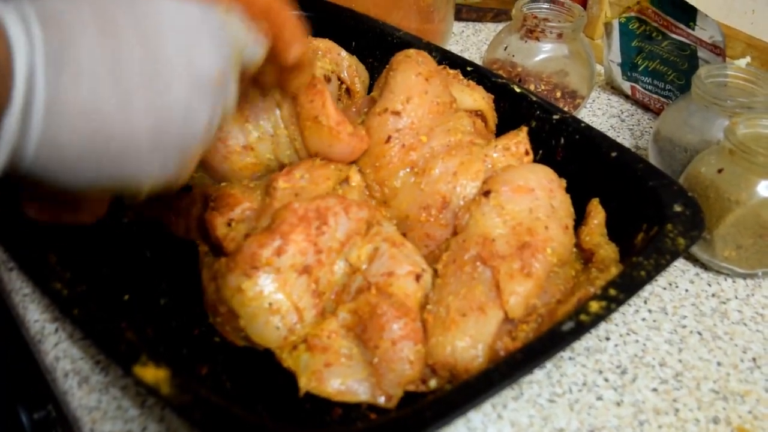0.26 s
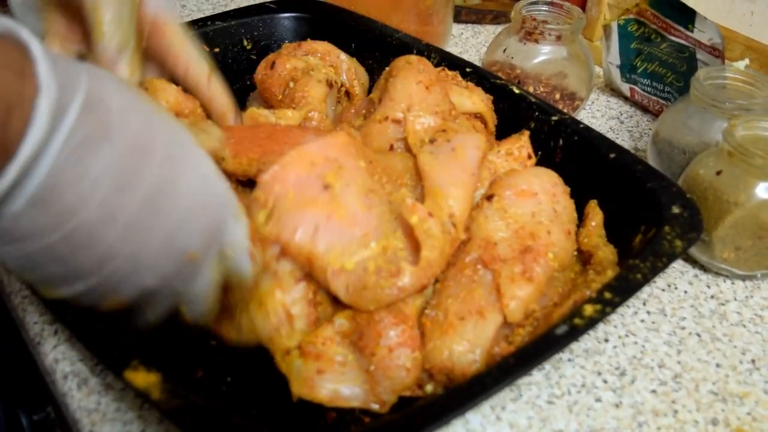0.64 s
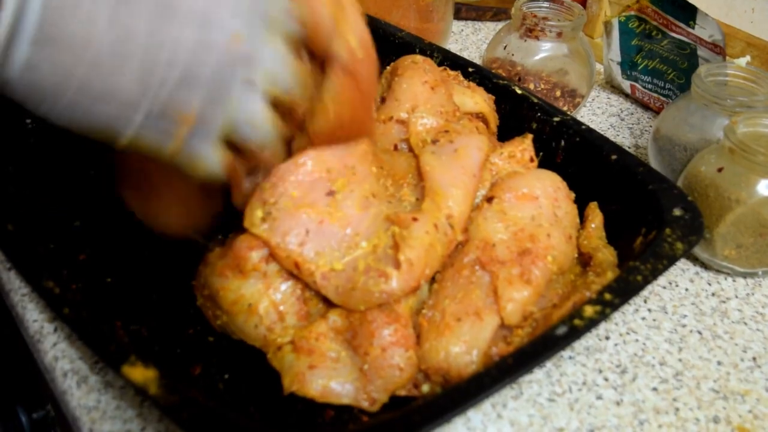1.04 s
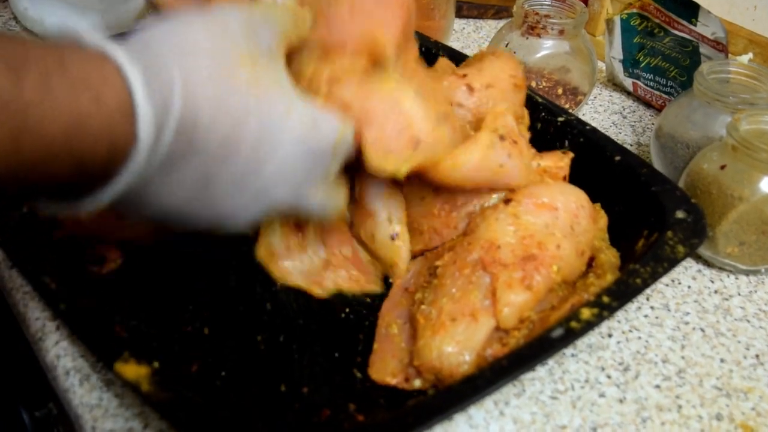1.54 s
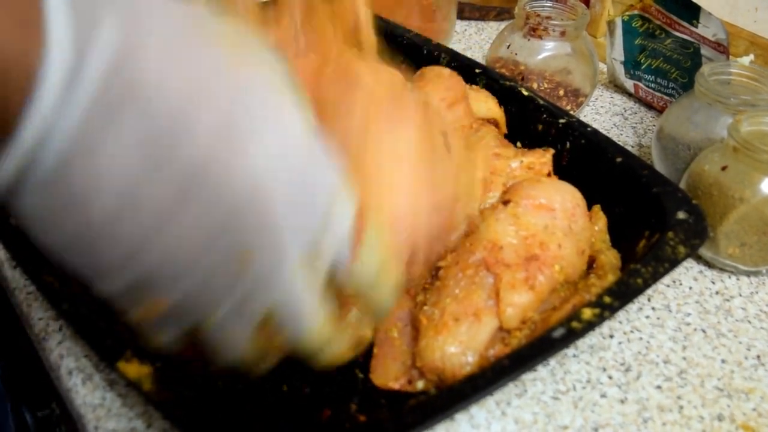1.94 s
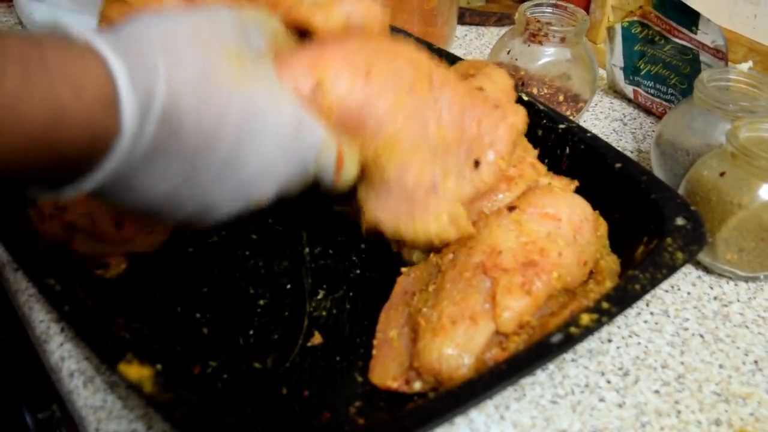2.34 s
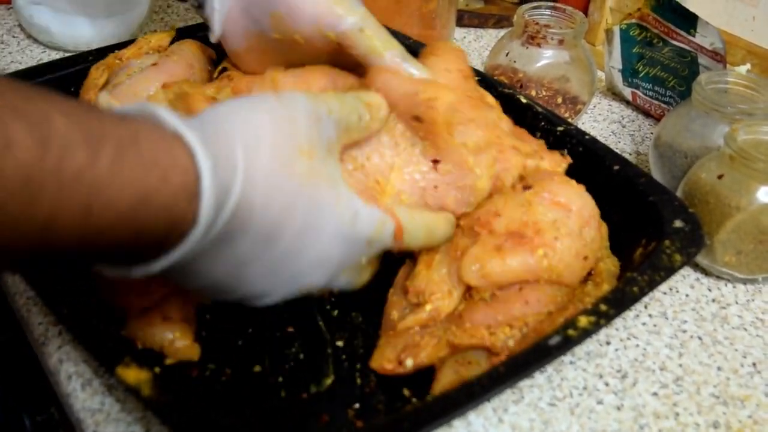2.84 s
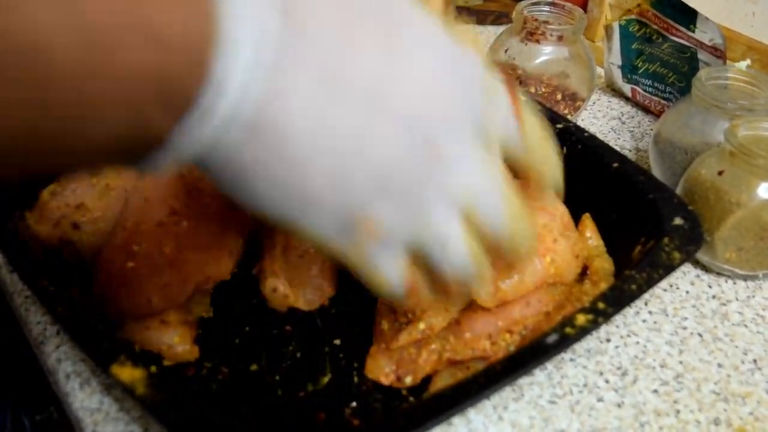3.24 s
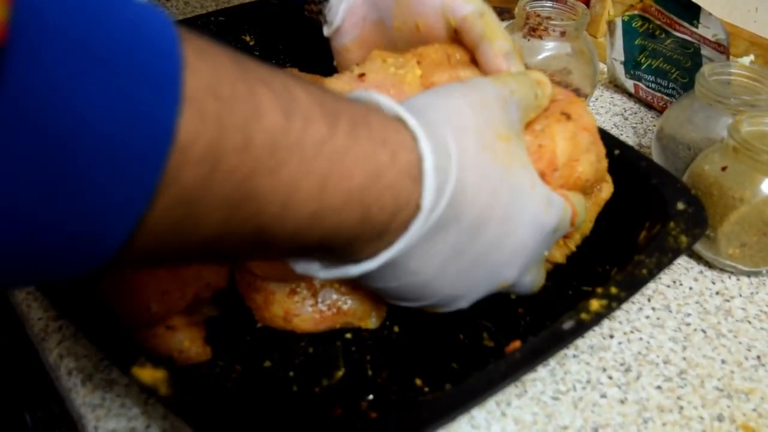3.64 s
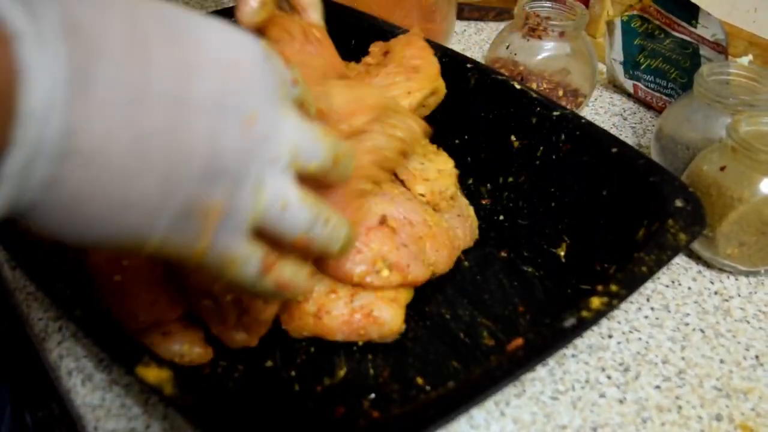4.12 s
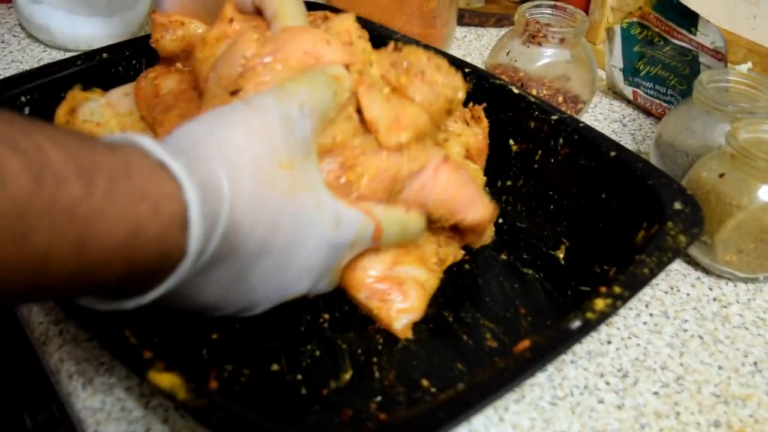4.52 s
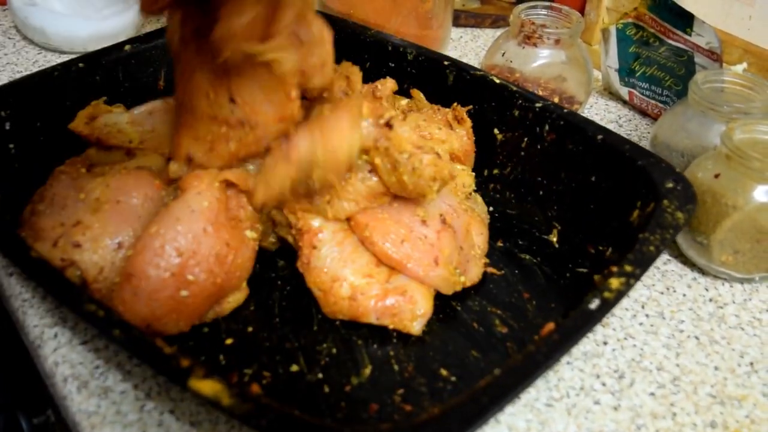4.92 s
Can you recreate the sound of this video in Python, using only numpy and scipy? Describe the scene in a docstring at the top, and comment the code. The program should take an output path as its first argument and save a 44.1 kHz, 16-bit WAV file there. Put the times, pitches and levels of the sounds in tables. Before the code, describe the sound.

Close wet squishing and sticky popping of meat being tossed and kneaded, with dull hollow bangs from the metal tray beneath it.

```python
"""Knocks of a metal roasting tray on a kitchen counter, and oily raw chicken squelching under gloved hands.
The tray rings as a sum of damped modes, and low modes and noise make its bumps and rumble.
The meat is crowds of tiny bursting cavities and noise, with snapping air pockets and flat wet slaps.
A small kitchen answers with a diffuse tail over a faint hush; the hardest knocks overload the recorder."""
import sys
import numpy as np
from scipy import signal
from scipy.fft import rfft, irfft, next_fast_len
from scipy.io import wavfile
from scipy.ndimage import uniform_filter1d, map_coordinates

SR = 44100
rng = np.random.default_rng(int(sys.argv[2]) if len(sys.argv) > 2 else 0)


def int16_out(signal):
    """Quantize to a 16-bit WAV file."""
    q = np.round(np.clip(np.atleast_2d(signal).T, -1, 1) * 32767)
    wavfile.write(sys.argv[1], SR, q.astype(np.int16))


N = 227997  # length in samples

# The tray hits the counter: start_s [s], level_db [dB, clang before trim],
# edge_db [dB, hard edge sought relative to the clang]
TRAY_KNOCKS = [(0.001, -15.5, -10.5), (0.141, 0, -14.5), (0.383, -19.5, -20), (0.548, -16, -25),
               (0.607, -10.5, -12), (0.63, -18, -8.5), (0.752, -16, -31.5), (0.803, -24.5, -39),
               (1.072, -37.5, 4.5), (1.14, -39.5, -2), (1.211, -27.5, 26), (1.458, -28, -2),
               (1.527, -20.5, -47), (1.962, -19.5, -8), (1.979, -9, -46), (1.989, -12, -28),
               (2.036, -18, -4), (2.077, -8, -14.5), (2.21, -25, -7), (2.43, -25, -35.5),
               (2.49, -31.5, -12), (2.561, -28.5, 0), (2.672, -2, -5.5), (2.681, -7, -14.5),
               (2.824, -11, -11.5), (3.093, -19, -32), (3.215, -10, -9), (3.318, -21.5, 7),
               (3.419, -12, -25), (3.606, -14, -16), (3.911, -19.5, -14), (4.062, -15.5, -10),
               (4.194, -21.5, -33), (4.34, -20.5, -3.5), (4.417, -22.5, -9), (4.428, -14.5, -24),
               (4.528, -28.5, -30), (4.672, -26.5, -43), (5.003, -39, -20.5)]
# Spectrum of the tray's flexing rumble: frequency_hz [Hz], density_db [dB per Hz, relative]
FLEX_SPECTRUM = [(20, -64.5), (48, -3), (68, 2.5), (85, -4.5), (115, -2.5), (135, -1.5), (160, -8.5),
                 (400, -7.5), (1500, -37)]
# The low thud grows less than the clang does
THUD_DB, THUD_PER_PEAK = -28.5, 0.32
# A soft landing trades edge for hollow body, which also grows less than the clang
HOLLOW_DB, HOLLOW_PER_EDGE, HOLLOW_PER_PEAK = -15, 0.3, 0.2
# A heavier landing presses more meat on the metal and leaves less ring
LINGER_DB, LINGER_PER_PEAK = -21.5, 0.39


def tray(rumble_db):
    """Impact and flexure: the tray rocks under the hands, knocking and rumbling on the counter."""
    out = np.zeros(N)
    for start_s, level_db, edge_db in TRAY_KNOCKS:
        thud_db = THUD_DB - THUD_PER_PEAK * level_db
        hollow_db = HOLLOW_DB - HOLLOW_PER_EDGE * edge_db - HOLLOW_PER_PEAK * level_db
        linger_db = LINGER_DB - LINGER_PER_PEAK * level_db
        blow = knock(thud_db, hollow_db, edge_db, linger_db)
        add(out, start_s, amp(level_db - 6.0) * blow)
    rumble = amp(rumble_db - 3.0) * noise(FLEX_SPECTRUM)
    return out + rumble


# Modes of the loaded tray: pitch_hz [Hz, nominal], level_db [dB, nominal], t60_s [s, lingering part]
TRAY_MODES = [(52.4, -7, 0.4), (113.6, -6, 0.44), (190, -17, 0.1), (273, -5.5, 0.098), (320.8, 1.5, 0.29),
              (375.5, -2, 0.49), (408, -6, 0.21), (512, -6, 0.47), (579, -3.5, 0.45), (663, -1, 0.14),
              (725, -5.5, 0.27), (796, -6, 0.044), (888, -5, 0.15), (955, -22, 0.089), (1150, -24, 0.44),
              (1294, -2.5, 0.53), (1320, -5.5, 0.38), (1375, -17, 0.34), (1504, -20, 0.081),
              (1802, -15.5, 0.057), (2420, -13, 0.075), (2800, -26, 0.14)]
# Filter for the contact clack: frequency_hz [Hz], density_db [dB per Hz, relative]
CLACK_SPECTRUM = [(30, -30.5), (110, -15.5), (200, -14), (330, -8.5), (700, -6.5), (1350, -10),
                  (1750, -14.5), (2100, -23), (2600, -26.5), (3700, -26.5), (5200, -43), (16000, -55)]


def knock(thud_db, hollow_db, edge_db, linger_db):
    """Modal impact: a noisy clack excites modes that the meat damps quickly and that linger faintly."""
    t = np.arange(SR // 2) / SR
    ring = np.zeros(len(t))
    for pitch_hz, level_db, t60_s in TRAY_MODES:
        # the shifting load detunes each mode a little and changes its share
        pitch_hz = pitch_hz * rng.normal(1, 0.01)
        level_db = level_db + rng.normal(0, 2.5)
        decay = amp(-60 * t / 0.053) + amp(linger_db - 60 * t / t60_s)
        swell = 1 - np.exp(-t * pitch_hz / 1.24)  # each mode needs about a cycle to build up
        mode = np.sin(2 * np.pi * (pitch_hz * t + rng.random()))
        ring += amp(level_db) * decay * swell * mode

    # the soft load spreads the contact over a few milliseconds
    landing = 1 - np.exp(-t / 0.0025)
    contact = (amp(-60 * t / 0.034) + amp(-18 - 60 * t / 0.049)) * landing
    clack = unit(colour(rng.standard_normal(len(t)) * contact, CLACK_SPECTRUM))
    blow = kitchen(amp(-2) * unit(ring) + clack, wet_db=-8)

    # where and how softly the tray lands sets the balance of thud, hollow body and edge
    clang = band_level(blow, 200, 1600)
    thud = 20 * np.log10(band_level(blow, 40, 180) / clang)
    hollow = 20 * np.log10(band_level(blow, 200, 450) / clang)
    edge = 20 * np.log10(band_level(blow, 1800, 4000) / clang)
    thud_lift = thud_db + 13.0 - thud
    hollow_lift = np.clip(hollow_db + 3 - hollow, -10, 6)
    edge_lift = np.clip(edge_db - edge, -4, 9)
    balance = [(120, thud_lift), (190, hollow_lift), (380, hollow_lift),
               (600, 0.028), (1400, 0.014), (2600, edge_lift)]
    blow = colour(blow, balance)
    return blow / band_level(blow, 200, 1600)


# Meat is pressed down and the tray's floor flexes: start_s [s], level_db [dB], pitch_hz [Hz]
FLOOR_BUMPS = [(1.981, -26, 50.7), (2.045, -30, 63.6), (2.485, -42.5, 122), (2.693, -23, 111),
               (3.321, -35, 60), (3.365, -34, 108), (4.235, -35, 121), (4.355, -34, 48.3)]


def bumps():
    """Slow forcing: a gradual push swells one low mode of the loaded tray, without any clack."""
    out = np.zeros(N)
    t = np.arange(SR // 3) / SR
    swell = (t / 0.02) ** 2 * np.exp(2 - 2 * t / 0.018)
    for start_s, level_db, pitch_hz in FLOOR_BUMPS:
        add(out, start_s, amp(level_db) * swell * np.sin(2 * np.pi * pitch_hz * t))
    return out


# Spectrum of the tearing oily films: frequency_hz [Hz], density_db [dB per Hz, relative]
FILM_SPECTRUM = [(500, -19.5), (1500, -8.5), (3000, -3.5), (4200, -2), (5600, -2.5), (6800, -8), (8200, -8),
                 (9500, -7), (12000, -7.5), (16000, -13)]
# Spectrum of the squish between the pieces: frequency_hz [Hz], density_db [dB per Hz, relative]
FLESH_SPECTRUM = [(100, -8.5), (300, -6), (750, 2.5), (1300, 5), (2100, 0), (3500, -2), (6000, -3),
                  (16000, -53)]


def squelch(crackle_db, squish_db):
    """Cavity bursting: oily films crackle finely, larger cavities squish, and sliding smears both."""
    crackle = bubbles(count=9000, centre_hz=7340, spread=0.557, cycles=3.6, scatter_db=5.0, rise=0.091)
    squish = bubbles(count=5500, centre_hz=2480, spread=0.686, cycles=2.85, scatter_db=5.5, rise=0.11)
    tearing = unit(colour(crackle, FILM_SPECTRUM))
    squishing = unit(colour(squish, FLESH_SPECTRUM))
    # under hard kneading the single pops merge into a dense smear
    smear = np.interp(crackle_db, [-55, -40], [0.45, 0.7])  # share of the power
    films = np.sqrt(1 - smear) * tearing + np.sqrt(smear) * noise(FILM_SPECTRUM)
    flesh = np.sqrt(1 - smear) * squishing + np.sqrt(smear) * noise(FLESH_SPECTRUM)
    wet = amp(crackle_db + 1.0) * films + amp(squish_db - 1.5) * flesh
    return kitchen(sticking(crackle_db) * wet, wet_db=-12.5)


def bubbles(count, centre_hz, spread, cycles, scatter_db, rise):
    """Bubble resonance: a crackle of rms 1 from tiny cavities, each a damped sine rising as it opens."""
    start = rng.integers(0, N, count)
    hz = np.clip(centre_hz * np.exp(spread * rng.standard_normal(count)), 300, 17000)
    size = amp(scatter_db * np.minimum(rng.exponential(size=count), 4))
    life = cycles * np.exp(0.5 * rng.standard_normal((count, 1)))  # decay constant in cycles
    age = np.arange(SR // 200)  # samples
    turns = hz[:, None] * age / SR
    fade = np.exp(-turns / life)
    tone = np.sin(2 * np.pi * turns * (1 + rise * (1 - fade)))
    envelope = fade * (1 - fade ** 2) * (1 - age / len(age))
    grains = (size * np.sqrt(hz))[:, None] * tone * envelope
    places = start[:, None] + age
    return unit(np.bincount(places.ravel(), grains.ravel(), N)[:N])


# The wet faces stick and slip, so the squelch comes in short clumps
STICK_DB, STICKS_PER_S = 2.0, 150
# Under a firmer grip than SLIDING_DB the faces slide more smoothly
SLIDING_DB, STICK_PER_DB = -45, 0.1


def sticking(crackle_db):
    """Stick-slip friction: a random gain of rms 1 that flutters most where the crackle is weak."""
    knots = rng.standard_normal(N // 50)
    flutter = map_coordinates(knots, [np.arange(N) * STICKS_PER_S / SR], mode="wrap")
    depth_db = STICK_DB * np.clip(1 + STICK_PER_DB * (SLIDING_DB - crackle_db), 0, 2)
    return unit(amp(depth_db * flutter))


# A hand squeezes or peels the meat: start_s [s, at full grip], rise_s [s], hold_s [s],
# crackle_db [dB before trim], squish_db [dB before trim], rumble_db [dB before trim, of the tray]
HAND_GRIPS = [(0.0, .05, 0.061, -38.5, -35, -58), (0.24, .08, 0.074, -49.5, -56, -57),
              (0.69, 0.13, 0.019, -35, -34, -45), (0.924, 0.068, 0.012, -45.5, -70, -88),
              (1.327, 0.2, 0.07, -41.5, -34.5, -60), (1.538, 0.17, 0.039, -43, -44.5, -69),
              (1.961, 0.064, 0.21, -40.5, -33, -42.5), (2.314, 0.056, 0.027, -44, -58, -74.5),
              (2.52, 0.1, 0.009, -43, -55, -48), (2.669, 0.032, 0.16, -39.5, -32, -47),
              (2.977, 0.12, 0.06, -43.5, -58, -58), (3.31, .09, 0.026, -47, -42, -40),
              (3.457, 0.19, 0.089, -43, -35, -52), (3.736, 0.1, 0.084, -50, -64, -66),
              (4.076, 0.093, 0.018, -50, -36.5, -47), (4.38, 0.082, 0.11, -40.5, -35, -48),
              (4.64, 0.11, 0.027, -41.5, -54, -66), (4.746, 0.14, 0.023, -46.5, -46, -46),
              (4.888, .04, .02, -61, -59, -71), (5.132, 0.13, .04, -49, -48, -72)]
GRIP_RISE_DB, RELEASE_DB_PER_S = 19, 173  # swell over the rise; fall as the hand lets go
CLING_DB, CLING_DB_PER_S = -7, 47.5  # the meat clings and goes on peeling apart, fainter and for longer
REST_CRACKLE_DB, REST_SQUISH_DB, REST_RUMBLE_DB = -58, -58.5, -74  # the pile settles between grips


def kneading():
    """Power summation: dB of crackle, squish and rumble as grips swell, hold, let go and cling."""
    t = np.arange(N) / SR
    rest_db = [[REST_CRACKLE_DB], [REST_SQUISH_DB], [REST_RUMBLE_DB]]
    power = amp(rest_db) ** 2 * np.ones(N)
    for start_s, rise_s, hold_s, *levels_db in HAND_GRIPS:
        closing = np.maximum(start_s - t, 0) / rise_s
        since = np.maximum(t - start_s - hold_s, 0)
        release_db = np.maximum(-RELEASE_DB_PER_S * since, CLING_DB - CLING_DB_PER_S * since)
        grip_db = release_db - GRIP_RISE_DB * closing
        power += np.outer(amp(levels_db), amp(grip_db)) ** 2
    return 10 * np.log10(power)


# Wet meat slaps down flat: start_s [s], level_db [dB, dry peak before trim], pitch_hz [Hz, trapped air]
WET_SLAPS = [(1.9791, 2.5, 665), (2.0376, -11.5, 1460), (2.6684, -9, 1705), (3.2639, -7, 1520),
             (3.319, -10, 1390)]
# Filter for the slap's crack: frequency_hz [Hz], density_db [dB per Hz, relative]
SMACK_SPECTRUM = [(200, -105), (800, -0.5), (1600, 6.5), (2400, -3.5), (3800, 1), (5600, -2), (7000, -11.5),
                  (10000, -8.5), (16000, -24)]


def slaps():
    """Air expulsion: air squeezed from between two wet faces cracks over a wide band and rings briefly."""
    out = np.zeros(N)
    t = np.arange(SR // 4) / SR
    burst = (amp(-60 * t / 0.012) + amp(-22 - 60 * t / 0.05)) * (1 - np.exp(-t / 0.001))
    ring_envelope = amp(-60 * t / 0.013) * (1 - np.exp(-t / 0.00041))
    for start_s, level_db, pitch_hz in WET_SLAPS:
        crack = unit(colour(rng.standard_normal(len(t)) * burst, SMACK_SPECTRUM))
        pocket = unit(np.sin(2 * np.pi * pitch_hz * t) * ring_envelope)
        slap = crack + amp(3.0) * pocket
        add(out, start_s, amp(level_db + 1.5) * kitchen(slap / np.abs(slap).max(), wet_db=-15))
    return out


# The larger air pockets burst in the meat: start_s [s], level_db [dB, dry peak before trim],
# pitch_hz [Hz, cavity as it starts to open]
POCKET_SNAPS = [(0.1577, -18.5, 2500), (0.4031, -27.5, 3940), (0.5315, -24, 3980), (0.5546, -16.5, 4690),
                (0.5654, -27, 5270), (0.7074, -19, 3240), (0.7357, -19, 2500), (0.9542, -24, 4180),
                (1.07, -42, 4360), (1.1828, -26.5, 3140), (1.2131, -24, 2840), (1.4461, -22.5, 3260),
                (1.543, -18, 2560), (1.788, -32.5, 3850), (2.0734, -11, 2600), (2.2592, -26, 3080),
                (2.3334, -23, 2820), (2.4883, -26, 3540), (2.5637, -22, 3000), (2.6077, -22.5, 3870),
                (2.804, -16.5, 5000), (3.0143, -31.5, 3140), (3.464, -18, 5630), (3.5338, -22, 3270),
                (4.0193, -32, 3500), (4.0604, -20, 4130), (4.0858, -18, 5350), (4.1104, -23.5, 4770),
                (4.1447, -28.5, 2800), (4.5716, -22, 5420), (4.6622, -29, 5530), (4.7483, -25, 2660),
                (4.8913, -28, 4550), (5.1592, -24.5, 5030)]


def snaps(crackle_db):
    """Cavity resonance: each pocket opens with a tick and a brief rising ring, coloured by its size."""
    out = np.zeros(N)
    t = np.arange(SR // 4) / SR
    burst = amp(-60 * t / 0.02) * (1 - np.exp(-t / 0.0005))
    opening = 1 + 0.11 * (1 - np.exp(-t / 0.0065))
    for start_s, level_db, pitch_hz in list(POCKET_SNAPS) + small_snaps(crackle_db, count=10):
        tick_spectrum = [(pitch_hz / 6, -20), (pitch_hz / 2, -5), (pitch_hz, 0),
                         (pitch_hz * 1.28, -6), (pitch_hz * 4, -11)]
        tick = unit(colour(rng.standard_normal(len(t)) * burst, tick_spectrum))
        cavity = unit(np.sin(2 * np.pi * pitch_hz * t * opening) * amp(-60 * t / 0.02))
        pop = tick + amp(-3.0) * cavity
        add(out, start_s, amp(level_db - 1.0) * kitchen(pop / np.abs(pop).max(), wet_db=-6.5))
    return out


# Small pockets: level over the crackle before trim, its scatter, typical cavity
SMALL_SNAP_DB, SMALL_SNAP_SCATTER_DB, SMALL_SNAP_HZ = 16.5, 4, 4200


def small_snaps(crackle_db, count):
    """Random bursting: (start_s, level_db, pitch_hz) rows, louder where the meat is worked harder."""
    at = rng.integers(0, N, count)
    strength, cavity = rng.standard_normal((count, 2)).T
    level_db = crackle_db[at] + SMALL_SNAP_DB + SMALL_SNAP_SCATTER_DB * strength
    pitch_hz = SMALL_SNAP_HZ * np.exp(0.21 * cavity)
    return list(zip(at / SR, level_db, pitch_hz))


# Reverberation of the small kitchen: frequency_hz [Hz], t60_s [s]
KITCHEN_DECAY = [(100, 0.27), (500, 0.42), (1500, 0.25), (4000, 0.17), (14000, 0.19)]


def kitchen(x, wet_db):
    """Reverberation: the direct sound plus a diffuse noise tail whose decay time depends on frequency."""
    hz, t, z = signal.stft(rng.standard_normal(SR // 2), SR, nperseg=256)
    t60_s = along(KITCHEN_DECAY, hz)[:, None]
    decay = amp(-60 * t / t60_s) * (1 - np.exp(-t / 0.0028))
    tail = signal.istft(z * decay, SR)[1]
    tail = tail / np.linalg.norm(tail)
    return x + amp(wet_db) * signal.fftconvolve(x, tail)[:len(x)]


def amp(db):
    """Logarithmic level: decibels to gain."""
    return 10 ** (np.asarray(db) / 20)


def unit(x):
    """Mean-square normalisation: scaled to rms 1."""
    return x / np.sqrt(np.mean(x ** 2) + 1e-20)


def along(points, hz):
    """Logarithmic interpolation: (Hz, value) points read on a log frequency axis."""
    f, v = np.transpose(points)
    return np.interp(np.log(hz + 1), np.log(f + 1), v)


def colour(x, points):
    """Minimum-phase filtering: a causal response through (Hz, dB) points, by folding the cepstrum."""
    m = 2 * next_fast_len(len(x))
    gain = amp(along(points, np.fft.rfftfreq(m, 1 / SR)))
    cepstrum = irfft(np.log(gain))
    cepstrum[1:m // 2] *= 2
    cepstrum[m // 2 + 1:] = 0
    response = np.exp(rfft(cepstrum))
    return irfft(rfft(x, m) * response)[:len(x)]


def noise(points):
    """Spectral shaping: coloured noise of rms 1."""
    return unit(colour(rng.standard_normal(N), points))


def add(track, start_s, sound):
    """Superposition: mix a sound in at a time."""
    room_left = track[max(round(start_s * SR), 0):][:len(sound)]
    room_left += sound[:len(room_left)]


def band_level(x, lo, hi):
    """Short-time energy: greatest rms of one band over 20 ms."""
    band = signal.butter(2, [lo, hi], "band", fs=SR, output="sos")
    y = signal.sosfilt(band, x)
    return np.sqrt(np.abs(uniform_filter1d(y ** 2, size=882)).max())


# Spectrum of the room's hush: frequency_hz [Hz], density_db [dB per Hz, relative]
HUSH_SPECTRUM = [(25, 23), (110, 2), (200, 7), (330, 13), (500, 0.5), (1300, -6), (2500, 4.5), (5400, -22),
                 (7000, -4.5), (15500, -5), (16000, -14)]


def scene():
    """Superposition: tray, meat and the steady hush of the room."""
    crackle_db, squish_db, rumble_db = kneading()
    metal = tray(rumble_db) + bumps()
    meat = squelch(crackle_db, squish_db) + slaps() + snaps(crackle_db)
    hush = amp(-53.5) * noise(HUSH_SPECTRUM)
    return (metal + meat + hush)[None]


TOP_HZ = 16000  # the recorder's band limit


def record(dry):
    """Band limiting and saturation: deep bass is thinned, high peaks flattened, the top cut steeply."""
    bass_cut = signal.butter(3, 38, "high", fs=SR, output="sos")
    thinned = signal.sosfilt(bass_cut, dry)
    clipped = thinned / (1 + np.abs(thinned) ** 8) ** (1 / 8)
    top_cut = signal.ellip(10, 0.1, 90, TOP_HZ, fs=SR, output="sos")
    return signal.sosfilt(top_cut, clipped)


dry = scene()
out = record(dry)
int16_out(out)
```